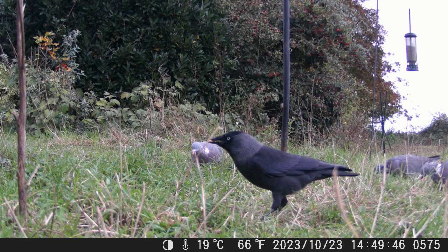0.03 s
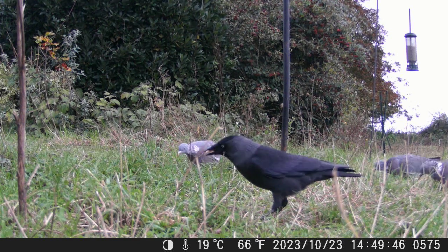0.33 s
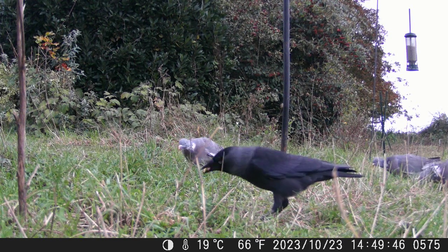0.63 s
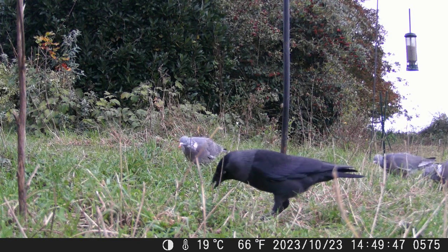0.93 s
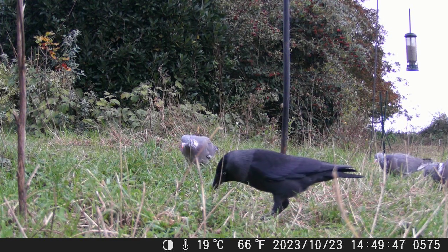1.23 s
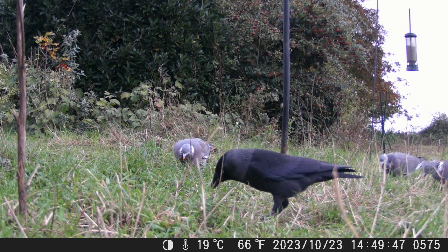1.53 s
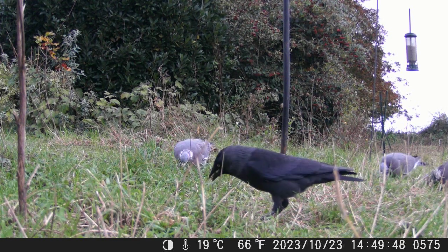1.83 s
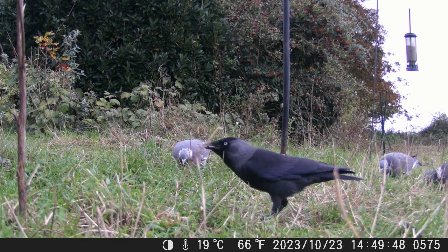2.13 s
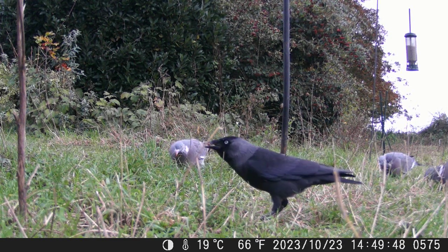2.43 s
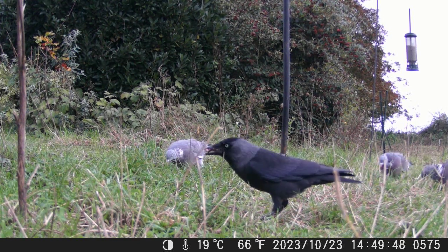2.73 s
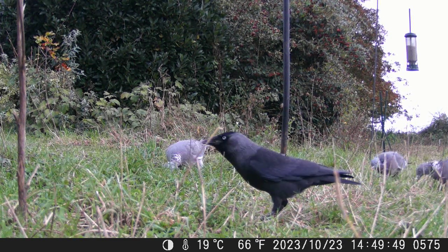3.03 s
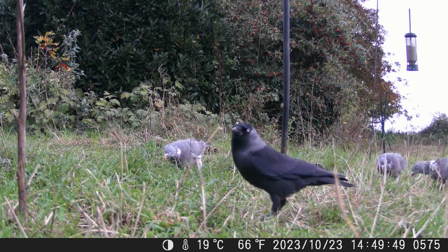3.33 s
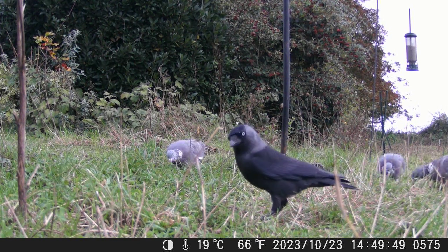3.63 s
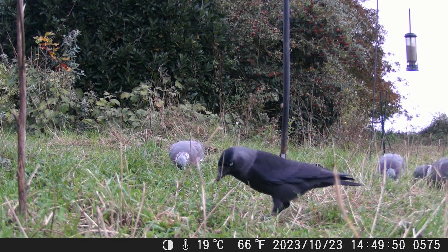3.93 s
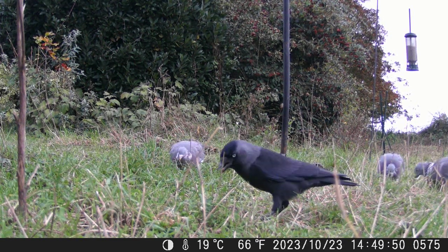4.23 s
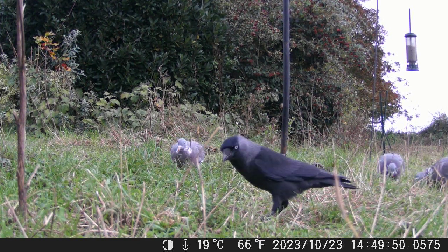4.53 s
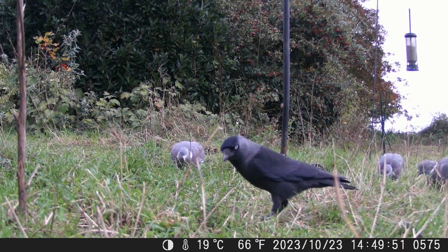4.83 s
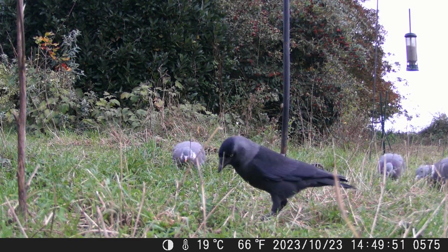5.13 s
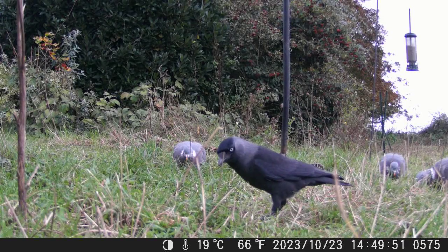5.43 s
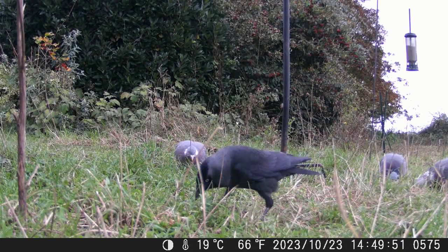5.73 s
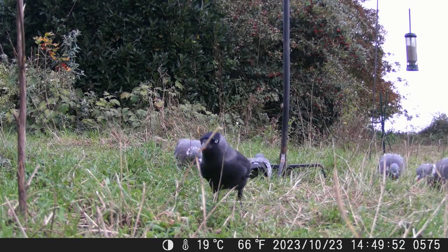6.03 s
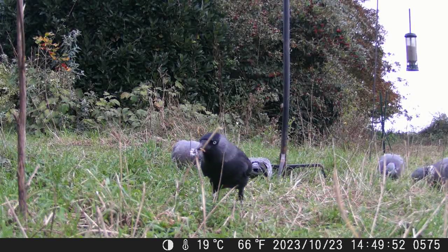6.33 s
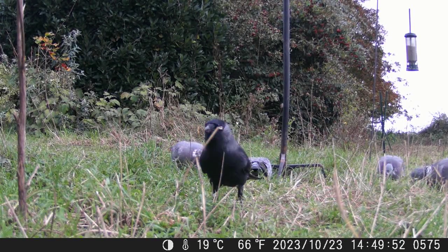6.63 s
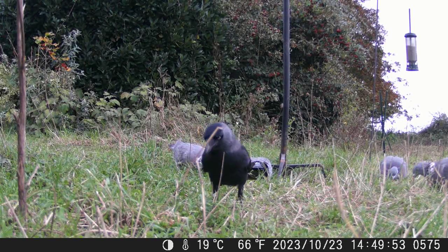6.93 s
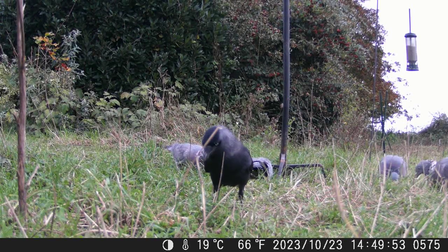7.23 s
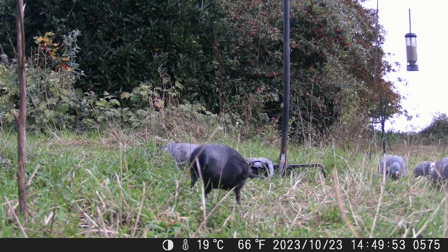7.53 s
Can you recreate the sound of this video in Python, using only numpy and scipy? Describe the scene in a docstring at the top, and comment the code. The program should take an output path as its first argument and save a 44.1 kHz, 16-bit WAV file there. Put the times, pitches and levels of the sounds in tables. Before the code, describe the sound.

It starts silent. From about 0.8 to 1.5 seconds, quiet garden ambience rises in small even steps, with a very faint microphone hiss. A breeze rumbles low on the microphone, gusting from 1.8 seconds, strongest at about 3.2, then settling after 4. A distant engine drones throughout with a low, beating hum, easing slightly around 4.5 and 6 seconds and picking up at the end. Cars pass on a far road as soft swells of roar and tyre hiss, near 1, 2.3, 3, 4.5 and 6.3 seconds. A far bird gives one short whistled call from 1.2 to 1.6 seconds, blurred by trees. Small birds make very faint, quick high chips in a hedge between 1.8 and 4 seconds. At about 6.6 seconds a dry stem gives a tiny, sharp tick.

```python
"""A gusty breeze rumbles on the housing of a trail camera in a quiet garden, then settles.
Cars pass on a far road with roar and tyre hiss; a distant engine drones in low beating lines.
A far bird calls once, small birds chip in the hedge, and dry stems tick near the end.
The camera wakes in silence, raises its input in even steps and adds a faint hiss."""
import sys
import numpy as np
from scipy import signal
from scipy.fft import rfft, irfft, next_fast_len
from scipy.io import wavfile
from scipy.ndimage import uniform_filter1d, map_coordinates

SR = 44100
rng = np.random.default_rng(int(sys.argv[2]) if len(sys.argv) > 2 else 0)


def to_wav(sig):
    """Store sig (one row per channel, or 1-D mono) as 16-bit WAV at the path in sys.argv[1].

    Samples outside -1..1 are clipped; the rate is SR.
    """
    pcm = np.clip(np.atleast_2d(sig), -1, 1) * 32767
    pcm = np.round(pcm).astype(np.int16)
    wavfile.write(sys.argv[1], SR, pcm.T)  # frames by channels


N = 334278


def amp(db):
    """Decibels to gain."""
    return 10 ** (np.asarray(db) / 20)


def unit(x):
    """x at rms 1."""
    return x / np.sqrt(np.mean(x ** 2) + 1e-20)


def add(track, start_s, sound):
    """Mix a sound into the track."""
    start = round(start_s * SR)
    track[start:start + len(sound)] += sound[:N - start]


def wobble(rate_hz):
    """Smooth random curve through rate_hz knots a second."""
    knots = rng.standard_normal(int(N * rate_hz / SR) + 4)
    return map_coordinates(knots, [np.arange(N) * rate_hz / SR])


def swell(peak_s, rise_s, fall_s):
    """Asymmetric Gaussian hump of height 1."""
    t = np.arange(N) / SR - peak_s
    return np.exp(-0.5 * (t / np.where(t < 0, rise_s, fall_s)) ** 2)


def noise(spectrum, patchy_db):
    """Coloured noise at rms 1 with random patches of gain in time and frequency."""
    bins = signal.stft(rng.standard_normal(N), nperseg=1024)[2]
    patches = uniform_filter1d(rng.standard_normal(bins.shape), size=7, axis=0)
    patches = uniform_filter1d(patches, size=16, axis=1)
    patchy = signal.istft(bins * amp(patchy_db * unit(patches)), nperseg=1024)[1][:N]
    size = next_fast_len(N + SR // 2)
    freq_hz = np.fft.rfftfreq(size, 1 / SR)
    points_hz, points_db = np.transpose(spectrum)
    colour_db = np.interp(np.log(freq_hz + 1), np.log(points_hz), points_db)
    return unit(irfft(rfft(patchy, size) * amp(colour_db), size)[:N])


# Wind rumble spectrum: freq_hz, relative_db
RUMBLE_SPECTRUM = [(3, -25.5), (9, -1.5), (25, 2.5), (45, -2.5), (65, -6), (85, -8.5), (110, -18.5),
                   (160, -29), (250, -36.5), (500, -59.5), (1200, -120)]
# Gusts: peak_s, level_db
GUSTS = [(1.78, -32.5), (2.25, -33), (2.75, -29), (3.16, -24), (3.72, -36.5), (4.0, -34.5)]

def breeze(calm_db=-40.5, swell_db=-33.5):
    """Air presses on the housing: calm air, one slow swell and its gusts add in power."""
    power = amp(calm_db) ** 2 + (amp(swell_db) * swell(peak_s=2.41, rise_s=0.84, fall_s=1.62)) ** 2
    for peak_s, level_db in GUSTS:
        power += (amp(level_db) * swell(peak_s, rise_s=0.12, fall_s=0.09)) ** 2
    return np.sqrt(power) * noise(RUMBLE_SPECTRUM, patchy_db=0.73)


# Road roar spectrum: freq_hz, relative_db
ROAR_SPECTRUM = [(40, -18.5), (100, -1), (200, 2.5), (270, 2), (340, -0.5), (500, -1), (800, -2),
                 (1000, -5.5), (1300, -16), (1800, -28.5), (3000, -50), (6000, -89)]
# Tyre hiss spectrum: freq_hz, relative_db
TYRE_SPECTRUM = [(400, -30), (800, -5), (1100, 2), (1400, -1.5), (1750, -6.5), (2100, -12), (2500, -17.5),
                 (3000, -24.5), (4000, -36.5), (6000, -70.5)]
# Passing cars: nearest_s, roar_db, tyre_db, distance_over_speed_s
CARS = [(1.0, -55.5, -63, .4), (2.25, -56.5, -64.5, .33), (3.05, -57.5, -68, .3), (4.5, -53.5, -64, .6),
        (6.3, -51.5, -66, .62)]

def traffic(wash_roar_db=-54.5, wash_tyre_db=-69):
    """Each car's power follows the inverse square of its distance, over a wash of farther traffic."""
    t = np.arange(N) / SR
    roar_power, tyre_power = amp(wash_roar_db) ** 2, amp(wash_tyre_db) ** 2
    for nearest_s, roar_db, tyre_db, distance_over_speed_s in CARS:
        nearness = 1 / (1 + ((t - nearest_s) / distance_over_speed_s) ** 2)
        roar_power += amp(roar_db) ** 2 * nearness
        tyre_power += amp(tyre_db) ** 2 * nearness
    roar = np.sqrt(roar_power) * noise(ROAR_SPECTRUM, patchy_db=0.8)
    tyres = np.sqrt(tyre_power) * noise(TYRE_SPECTRUM, patchy_db=0.83)
    return roar + tyres


# Engine lines: pitch_hz, relative_db, wander_hz
ENGINE_LINES = [(64.57, -0.5, .6), (53.5, -4, 1.2), (119.8, -21, .5), (129.6, -20.5, .7),
                (150.4, -24.5, .4), (179.8, -30, .8), (199.7, -28, 1.2), (270.6, -30, .9)]
# Engine loudness curve: time_s, level_db
ENGINE_LEVEL = [(0.8, -40), (3.9, -39), (4.5, -42.5), (5.2, -39), (5.9, -43), (6.8, -42.5), (7.55, -39)]

def engine(flutter_db=1.5):
    """A distant engine eases off and picks up; its wandering low lines beat against each other."""
    lines = np.zeros(N)
    for pitch_hz, relative_db, wander_hz in ENGINE_LINES:
        gain = amp(relative_db + flutter_db * wobble(rate_hz=3))
        freq_hz = pitch_hz + wander_hz * wobble(rate_hz=3.996)
        lines += gain * np.sin(2 * np.pi * np.cumsum(freq_hz) / SR)
    level_db = np.interp(np.arange(N) / SR, *np.transpose(ENGINE_LEVEL))
    return np.sqrt(2) * amp(level_db) * lines


# Microphone hiss spectrum: freq_hz, relative_db
HISS_SPECTRUM = [(100, -0.5), (2000, 6.5), (3000, 6.5), (4000, -4.5), (4900, -11), (5600, -8), (6300, -2.5),
                 (7100, 0.5), (7700, -1.5), (8100, -6), (8700, -19)]

def microphone_hiss(level_db=-80):
    """The microphone's own noise."""
    return amp(level_db) * noise(HISS_SPECTRUM, patchy_db=0.6)


def whistles(notes):
    """Each note is a pure glide that swells and fades."""
    track = np.zeros(N)
    for start_s, length_s, start_hz, end_hz, peak_db in notes:
        progress = np.linspace(0, 1, round(length_s * SR))
        phase = 2 * np.pi * np.cumsum(start_hz + (end_hz - start_hz) * progress) / SR
        add(track, start_s, amp(peak_db) * np.sin(np.pi * progress) * np.sin(phase))
    return track


def foliage_echo(x, t60_s, wet_db):
    """Leaves and trunks scatter a short diffuse tail."""
    t = np.arange(SR) / SR
    tail = rng.standard_normal(SR) * amp(-60 * t / t60_s)
    return x + amp(wet_db) * signal.fftconvolve(x, tail / np.linalg.norm(tail))[:N]


# Far call notes: start_s, length_s, start_hz, end_hz, peak_db
CALL_NOTES = [(1.24, .11, 1380, 1427, -70), (1.35, 0.1, 1420, 1443, -66.5),
              (1.45, 0.079, 1518, 1270, -60.5), (1.52, 0.075, 1580, 1470, -66)]

def far_bird():
    """One whistled call, blurred by the trees."""
    return foliage_echo(whistles(CALL_NOTES), t60_s=0.39, wet_db=0.5)


# Hedge bird chips: start_s, length_s, start_hz, end_hz, peak_db
CHIPS = [(1.820, 0.026, 3160, 2600, -73), (2.664, 0.015, 3120, 3660, -76.5), (2.746, .016, 2950, 3400, -76),
         (2.837, .013, 3250, 4400, -82), (2.977, .015, 2700, 3710, -76), (3.573, .022, 2800, 3500, -77),
         (3.714, .018, 3200, 4010, -79), (3.986, .032, 3460, 2450, -72.5)]

def hedge_birds():
    """Quick high glides, near and almost dry."""
    return foliage_echo(whistles(CHIPS), t60_s=0.25, wet_db=-12.5)


# Stem snaps: start_s, level_db
SNAPS = [(6.6032, -73), (6.6085, -63.5)]

def stem_ticks(ring_hz=7100, decay_s=0.00054):
    """Dry stems snap and briefly ring the microphone port."""
    t = np.arange(SR // 100) / SR
    ring = np.exp(-t / decay_s) * np.sin(2 * np.pi * ring_hz * t)
    track = np.zeros(N)
    for start_s, level_db in SNAPS:
        add(track, start_s, amp(level_db) * ring)
    return track


def scene():
    """Garden and microphone hiss, mono."""
    background = breeze() + traffic() + engine() + microphone_hiss()
    return (background + far_bird() + hedge_birds() + stem_ticks())[None]


def wake_gain(wake_s=0.7685, step_s=0.1008, step_count=8, ease_s=0.00015):
    """The input opens from silence in equal, slightly rounded steps."""
    t = np.arange(N) / SR
    steps = np.clip(np.ceil((t - wake_s) / step_s), 0, step_count) / step_count
    ease = np.hanning(round(2 * ease_s * SR))
    return np.convolve(steps, ease / ease.sum(), "same")


def record(dry):
    """The camera steps its input up and cuts the top treble steeply."""
    cutoff_hz = 8800
    lowpass = signal.butter(14, cutoff_hz, fs=SR, output="sos")
    return signal.sosfilt(lowpass, dry * wake_gain())


dry = scene()
out = record(dry)
to_wav(out)
```